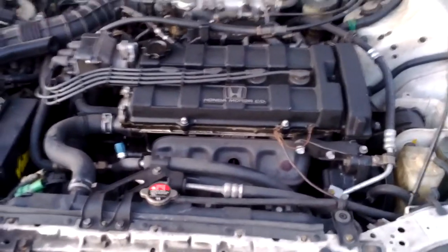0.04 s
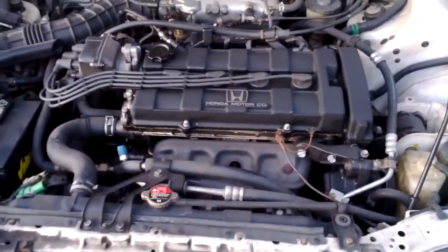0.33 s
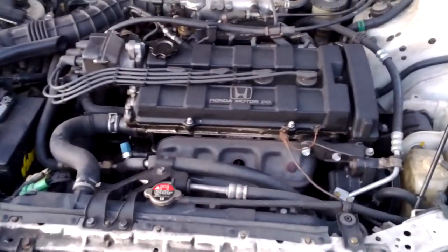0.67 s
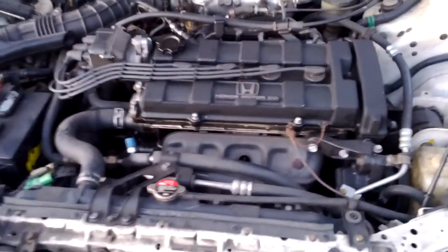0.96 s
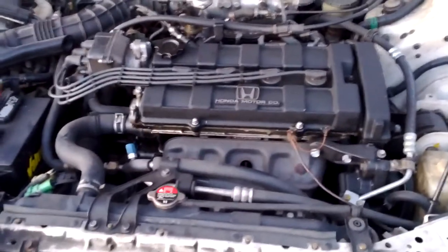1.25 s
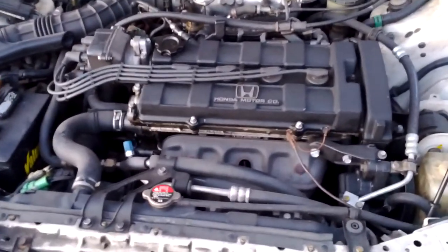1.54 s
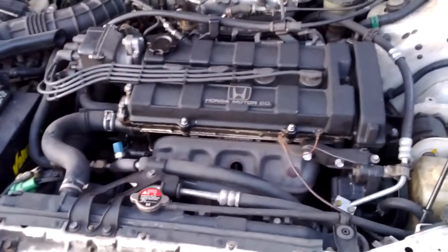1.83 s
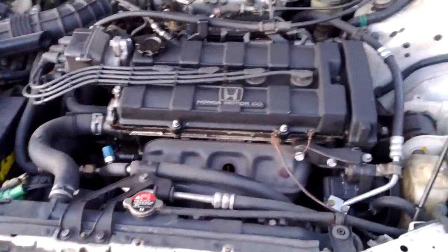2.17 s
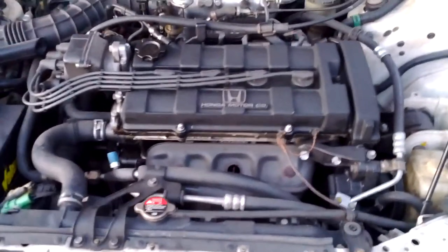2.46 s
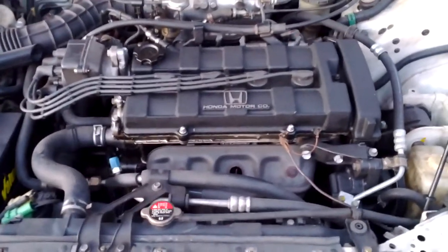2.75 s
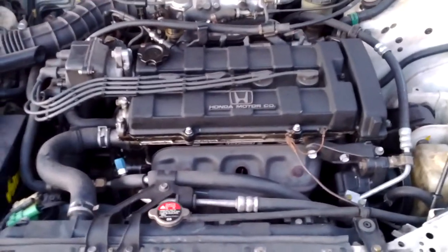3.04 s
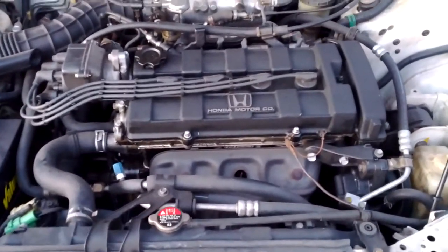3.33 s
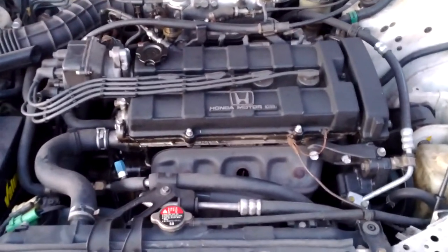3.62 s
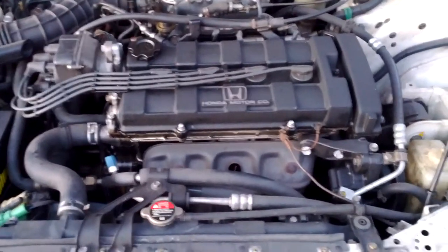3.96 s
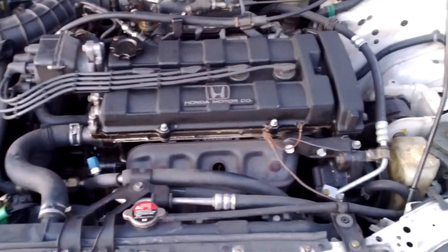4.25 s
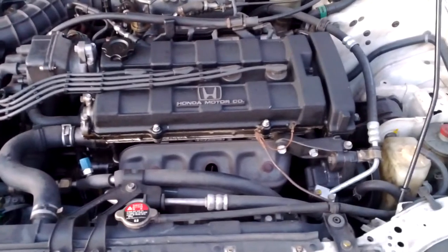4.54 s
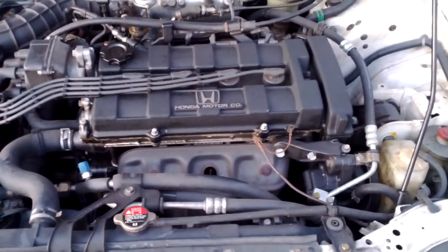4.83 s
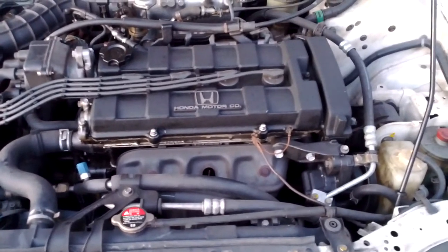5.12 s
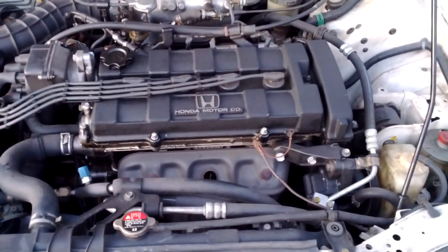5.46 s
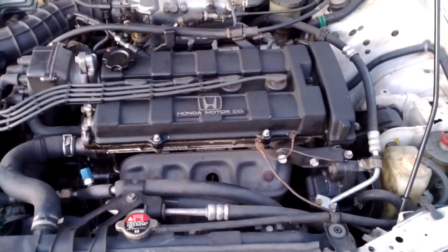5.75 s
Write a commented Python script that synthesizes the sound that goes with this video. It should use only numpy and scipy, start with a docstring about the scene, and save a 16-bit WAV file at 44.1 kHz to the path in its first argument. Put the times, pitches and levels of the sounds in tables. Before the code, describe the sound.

Fast, even metallic clacking and dull knocking come from an idling car engine, with the microphone just above the open engine bay. Underneath run a steady mechanical churn, a firing hum and a hissing belt. Clanking grows more prominent early on; midway the engine slows a little and recovers. A soft thud on the microphone follows, and then a wavering hollow drone rises as the ticking carries on.

```python
"""A four-cylinder petrol engine idles under an open bonnet, heard from close above. From the start, belt
hiss, a hollow drone, churning gear and the firing hum lie beneath three loose tappets, which clack in
every camshaft turn and ring the engine's metal; a duller knock fills the fourth beat. Near 2 s a clank
comes forward. After 3 s the speed sags, then picks up; at 4.7 s the microphone is bumped, and the drone
swells to its loudest just after. Throughout, a limiter holds the peaks."""
import sys
import numpy as np
from scipy import signal
from scipy.fft import rfft, irfft, next_fast_len
from scipy.io import wavfile
from scipy.ndimage import uniform_filter1d, minimum_filter1d, map_coordinates

SR = 44100
rng = np.random.default_rng(int(sys.argv[2]) if len(sys.argv) > 2 else 0)


def waveform_to_disk(signal):
    """Save audio, clipped to [-1, 1], as 16-bit WAV at the path in sys.argv[1]."""
    frames = np.transpose(np.atleast_2d(signal))
    scaled = np.clip(frames, -1, 1) * 32767
    samples = np.round(scaled).astype(np.int16)
    wavfile.write(sys.argv[1], SR, samples)


N = 264159


def amp(db):
    """The decibel law: 20 dB is a factor of ten in amplitude."""
    return 10 ** (np.asarray(db) / 20)


def curves(rows):
    """Linear interpolation of each column after the time, one value a sample."""
    s, *columns = np.transpose(rows)
    return [np.interp(np.arange(N) / SR, s, column) for column in columns]


def swells(rows):
    """Amplitude modulation: the level follows a bell curve around each swell."""
    t = np.arange(N) / SR
    return amp(sum(db * np.exp(-((t - s) / width) ** 2) for s, width, db in rows))


def filtered(x, response):
    """Linear filtering multiplies the spectrum by a frequency response."""
    size = next_fast_len(N + SR // 2)
    return irfft(rfft(x, size) * response(np.fft.rfftfreq(size, 1 / SR)), size)[:N]


def coloured(x, points):
    """Spectral shaping through (Hz, dB) points on a logarithmic frequency axis."""
    point_hz, db = np.transpose(points)
    return filtered(x, lambda hz: amp(np.interp(np.log(hz + 1), np.log(point_hz), db)))


def laid(times, sounds):
    """Superposition: one row of sounds starts at each time, and overlaps add."""
    index = np.round(times * SR).astype(int)[:, None] + np.arange(sounds.shape[1])
    inside = (index >= 0) & (index < N)
    return np.bincount(index[inside], sounds[inside], N)


def recurring(times, size, memory_s, fresh):
    """Correlated noise bursts: a slowly changing pattern plus a fresh share of power each time."""
    knots = np.arange(-1, N / SR + 1, .5)
    weight = np.exp(-((times[:, None] - knots) / memory_s) ** 2)
    weight /= np.linalg.norm(weight, axis=1, keepdims=True)
    kept = weight @ rng.standard_normal((len(knots), size))
    return np.sqrt(1 - fresh) * kept + np.sqrt(fresh) * rng.standard_normal(kept.shape)


def modes(hz, t60, swell_cycles):
    """Damped oscillation: each mode builds over some cycles and decays by 60 dB in t60 seconds."""
    t = np.arange(SR // 6) / SR
    cycles = hz[:, None] * t
    decay = np.exp(-np.log(1000) * t / t60[:, None])
    return np.sin(2 * np.pi * cycles) * decay * (1 - np.exp(-cycles / swell_cycles))


def struck(times, shapes, db, scatter_db):
    """Impact excitation: every blow rings the modes with slightly new strengths."""
    strengths = amp(db + scatter_db * rng.standard_normal((len(times), len(shapes))))
    return laid(times, strengths @ shapes)


# The engine's climb, sag and recovery. Each row: time in seconds, crankshaft speed in rpm.
ENGINE_SPEED = [(0, 1303.2), (1.53, 1359.8), (3.078, 1386.3), (3.604, 1314.6), (4.689, 1405), (6, 1465)]
IDLE_RPM, FIRST_CLACK_S = 1370, .0804


def camshaft():
    """Two-to-one gearing halves the crankshaft's speed; gives rows of (seconds, camshaft turns)."""
    s = np.arange(-.2, N / SR + .2, .001)
    turns_per_s = np.interp(s, *np.transpose(ENGINE_SPEED)) / 60 / 2
    turns = np.cumsum(turns_per_s) * (s[1] - s[0])
    return np.column_stack([s, turns - np.interp(FIRST_CLACK_S, s, turns)])


def passes(phase):
    """Rotation repeats events: the times at which the camshaft reaches a phase, given in turns."""
    s, turns = camshaft().T
    return np.interp(np.arange(np.ceil(turns[0]), np.floor(turns[-1])) + phase, turns, s)


def driven(rpm, idle_db, db_per_100_rpm):
    """A gain whose level in decibels is linear in engine speed."""
    return amp(idle_db + db_per_100_rpm * (rpm - IDLE_RPM) / 100)


# The belt's spectrum. Each row: frequency in Hz, relative spectral level in dB.
BELT_SPECTRUM = [(20, -13), (36, 3), (65, -3), (150, -5.5), (300, -1.5), (1000, 3), (2200, 2.5), (4500, -3),
                 (7500, -2), (9400, 1.5), (10300, 0.5), (12000, -1), (13500, -8), (15700, -10)]


def belt_hiss():
    """Broadband noise: the running belt spreads its power over a continuous spectrum."""
    return coloured(rng.standard_normal(N), BELT_SPECTRUM)


def microphone_bump(s, width_s, hz, db, half_band_hz=20):
    """A soft impact on the microphone thuds as narrow-band noise under a bell envelope."""
    rumble = filtered(rng.standard_normal(N), lambda f: 1 / (1 + ((f - hz) / half_band_hz) ** 2))
    rumble /= np.sqrt(np.mean(rumble ** 2))
    return amp(db) * np.exp(-((np.arange(N) / SR - s) / width_s) ** 2) * rumble


# The drone's swells. Each row: centre in seconds, half width in seconds, boost in dB.
DRONE_BOOSTS = [(.33, 0.24, 7), (2.85, .35, 5), (5.02, 0.33, 12), (5.95, 0.32, 6.5)]


def drone(hz, waver_rad, db, knots_per_s=12):
    """Smooth random phase modulation makes a hollow tone waver as it swells and fades."""
    t = np.arange(N) / SR
    knots = rng.standard_normal(int(N * knots_per_s / SR) + 4)
    wander = map_coordinates(knots, [t * knots_per_s])
    return amp(db) * swells(DRONE_BOOSTS) * np.sin(2 * np.pi * hz * t + waver_rad * wander)


# The hum's partials. Each row: multiple of the camshaft rate, relative level in dB.
FIRING_ORDERS = [(4, -4.5), (8, -4.5), (10, -4), (11, -9.5), (12, -3), (14, -9), (16, -10), (17, -30),
                 (20, -11.5), (24, -19), (26, -41), (28, -14.5)]


def firing_hum():
    """A harmonic series on the camshaft rate: four firings a turn and their uneven overtones."""
    turns, = curves(camshaft())
    return np.sqrt(2) * sum(amp(db) * np.sin(2 * np.pi * (round(order) * turns + rng.random()))
                            for order, db in FIRING_ORDERS)


# The moving parts' spectrum. Each row: frequency in Hz, relative spectral level in dB.
CHURN_SPECTRUM = [(100, -34), (180, -16), (300, -17.5), (420, -7), (600, -7.5), (800, -11.5), (1000, -5),
                  (1500, -20.5), (2200, -16.5), (3500, -20), (6000, -45), (15000, -48)]


def churn():
    """Quasi-periodic noise: pistons, gears and pumps sound nearly alike in every turn."""
    times, window = passes(0), signal.windows.tukey(SR // 10, .26)
    bursts = window * recurring(times, len(window), memory_s=1.92, fresh=0.014)
    return coloured(laid(times, bursts), CHURN_SPECTRUM)


def resonances(rows, swell_cycles, scatter_db, accents=()):
    """Periodic excitation: each mode is struck once a turn, harder within 25 ms of an accent."""
    out = np.zeros(N)
    for phase, hz, t60, db, db_per_100_rpm in rows:
        times = passes(phase)
        rpm = np.interp(times, *np.transpose(ENGINE_SPEED))
        extra_db = db_per_100_rpm * (rpm - IDLE_RPM) / 100
        extra_db += sum(boost * (np.abs(times - s) < .025) for s, boost in accents)
        shape = modes(np.array([hz]), np.array([t60]), swell_cycles)
        out += struck(times, shape, db + extra_db[:, None], scatter_db)
    return out


# The clank's resonances. Each row: phase in turns, frequency in Hz, t60 in seconds,
# relative level at idle in dB, change in dB per 100 rpm.
CLANK_MODES = [(.07, 1210, 0.028, 4.5, 4), (.26, 1030, 0.036, -4.5, -3), (.262, 1720, 0.03, 3.5, 2),
               (.316, 1530, .03, 3, -6), (.52, 2187, 0.023, -6.5, 16), (.55, 1215, 0.048, -2.5, -4)]
# The clank's swell. Each row: centre in seconds, half width in seconds, boost in dB.
CLANK_BOOSTS = [(1.9, 1, 5)]


def clank(db):
    """Short resonances answer the tappets in free vibration and come to the fore for a while."""
    return amp(db) * swells(CLANK_BOOSTS) * resonances(CLANK_MODES, swell_cycles=3, scatter_db=.7)


# The knock's lead-in, main blow and rebounds. Each row: phase in turns, frequency in Hz,
# t60 in seconds, relative level at idle in dB, change in dB per 100 rpm.
KNOCK_MODES = [(.66, 634, 0.018, -4.5, 4), (.758, 624, 0.019, -4, 7.5), (.762, 712, 0.017, -3, 1),
               (.768, 950, 0.021, -1, 2), (.77, 1503, 0.019, -4.5, 3), (.81, 824, 0.026, -1.5, -1.5),
               (.826, 636, 0.036, -3, -1), (.83, 1580, 0.017, -4, 3), (.86, 1137, 0.026, -2.5, 5),
               (.9, 505, 0.026, -8, 4)]
# Knocks that land harder. Each row: time in seconds, boost in dB.
HARD_KNOCKS = [(.7, 4.5), (1.5, 7), (2.03, 2), (5.84, 2)]


def knock(db):
    """Heavy damping of midrange modes makes a dull knock on the fourth beat."""
    return amp(db) * resonances(KNOCK_MODES, swell_cycles=1.2, scatter_db=1.2, accents=HARD_KNOCKS)


# The three tappets. Each row: phase in turns, then rise time, hold time and t60 in seconds.
TAPPETS = [(.004, 0.00037, 0.006, 0.042), (.251, 0.00022, 0.0049, 0.057), (.502, 0.0021, 0.0039, 0.053)]
# Their rattles' spectra. Each row: frequency in Hz, relative level in dB for each tappet in turn.
RATTLE_SPECTRA = [(200, -20.5, -22, -27), (447, -15, -21, -13), (670, -9, -13.5, -15),
                  (1050, -5.5, -3.5, -7), (1770, -2, -3.5, -3.5), (2320, -5.5, -12, -7.5),
                  (3230, -7, -3.5, -7), (5050, -5, -7.5, -7), (5940, -3, -7, -5), (8240, -4.5, -9.5, -8.5),
                  (9200, -4.5, -10.5, -10.5), (10770, -5, -14.5, -7.5), (13600, -14, -22.5, -15),
                  (15900, -29, -24, -40)]


def tappet_rattle(scatter_db):
    """Impact noise: each tappet sets off a burst of its own colour that holds briefly, then decays."""
    t, spectra, out = np.arange(SR // 10) / SR, np.array(RATTLE_SPECTRA), np.zeros(N)
    for column, (phase, rise, hold, t60) in enumerate(TAPPETS, start=1):
        times = passes(phase)
        envelope = (1 - np.exp(-t / rise)) * np.exp(-np.log(1000) * np.maximum(t - hold, 0) / t60)
        force = amp(scatter_db * rng.standard_normal((len(times), 1)))
        bursts = force * envelope * recurring(times, len(t), memory_s=1.03, fresh=0.2)
        out += coloured(laid(times, bursts), spectra[:, [0, column]])
    return out


# Modes of cover, head and heat shield. Each row: frequency in Hz, t60 in seconds,
# relative level in dB under each tappet in turn.
METAL_MODES = [(893, 0.044, -49, -8, -16), (1012.8, 0.12, -10.5, -22, -18.5), (1087, 0.036, -38, -42, -17),
               (1201.5, 0.12, -18, -17, -13.5), (1229, 0.076, -29, -12, -50), (1392, 0.17, -20.5, -29, -21),
               (1586, 0.09, -19, -13, -25), (1630, 0.054, -46, -34, -22), (1878, 0.077, -14, -41, -16),
               (2188, 0.038, -17.5, -14.5, -11.5), (2539, 0.071, -46, -16, -40),
               (2842, 0.039, -36, -23, -10), (3083, 0.049, -29, -22, -17), (3427, 0.068, -50, -25.5, -44),
               (3900, 0.065, -18, -16.5, -22.5), (4540, 0.021, -28, -43, -32),
               (5380, 0.031, -8, -38, -14.5), (6200, 0.021, -6.5, -20, -19),
               (7700, 0.042, -11.5, -16.5, -30), (7780, 0.043, -15, -20, -22),
               (11200, 0.034, -33, -40, -24)]


def metal_ring():
    """Modal vibration: all tappets ring the same modes, with strengths set by where each one strikes."""
    hz, t60, *levels = np.transpose(METAL_MODES)
    polarity = (-1) ** np.arange(len(hz))[:, None]  # neighbouring modes swing against each other
    shapes = polarity * modes(hz, t60, swell_cycles=9.5)
    return sum(struck(passes(phase), shapes, db, scatter_db=0.7)
               for (phase, *_), db in zip(TAPPETS, levels))


def scene():
    """The sources superpose in one channel; engine speed sets the beat and most of the levels."""
    rpm, = curves(ENGINE_SPEED)
    ring_rpm = np.minimum(rpm, 1390)  # the metal rings no louder above this speed
    impacts = driven(rpm, idle_db=2, db_per_100_rpm=3.5) * tappet_rattle(scatter_db=0.74)
    impacts += driven(ring_rpm, idle_db=3.88, db_per_100_rpm=4.9) * metal_ring()
    impacts += clank(db=-9) + knock(db=-9.5)
    background = driven(rpm, idle_db=-1.25, db_per_100_rpm=1.8) * churn()
    background += driven(rpm, idle_db=-35, db_per_100_rpm=.5) * firing_hum()
    background += drone(hz=422, waver_rad=0.42, db=-31)
    background += driven(rpm, idle_db=-19.5, db_per_100_rpm=0.78) * belt_hiss()
    thud = microphone_bump(s=4.72, width_s=0.043, hz=88, db=-30)
    return (background + thud + impacts)[None]


def record(dry):
    """Peak limiting dips the gain around each peak over the ceiling; a low-pass then limits the band."""
    ceiling, dip_samples, top_hz = .78, 15, 15850
    needed = np.minimum(1, ceiling / (np.abs(dry[0]) + 1e-9))
    gain = uniform_filter1d(minimum_filter1d(needed, dip_samples), dip_samples)
    return filtered(dry[0] * gain, lambda hz: hz < top_hz)[None]


dry = scene()
out = record(dry)
waveform_to_disk(out)
```